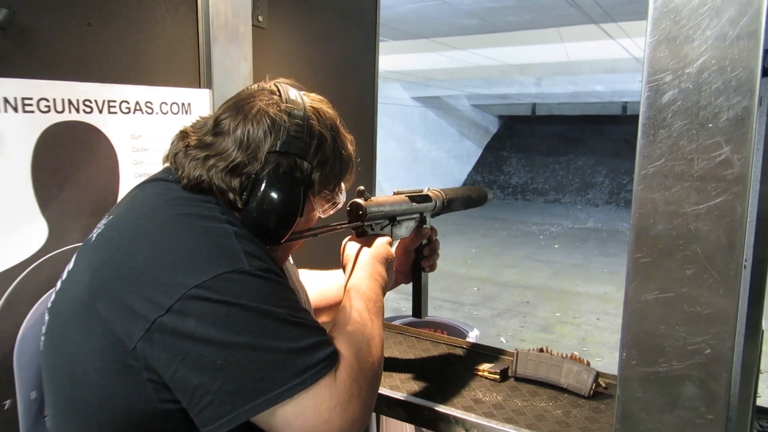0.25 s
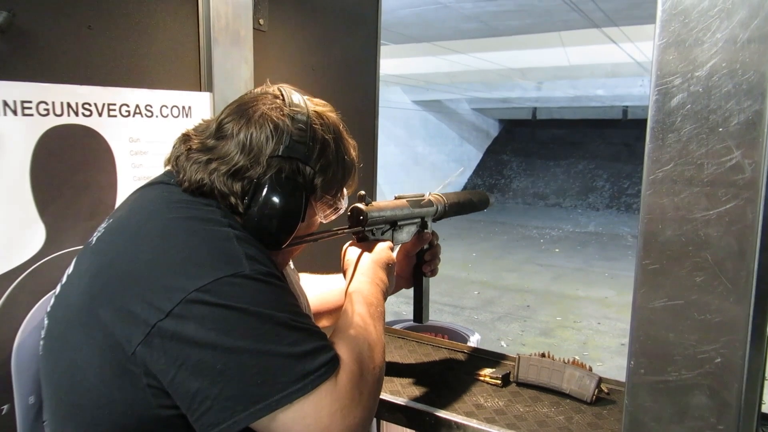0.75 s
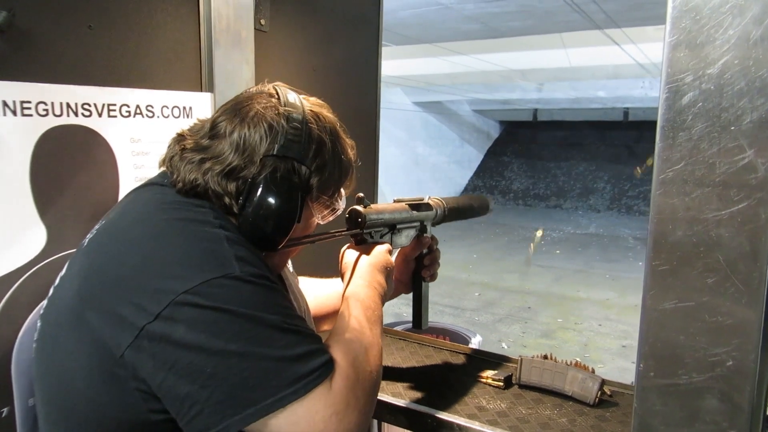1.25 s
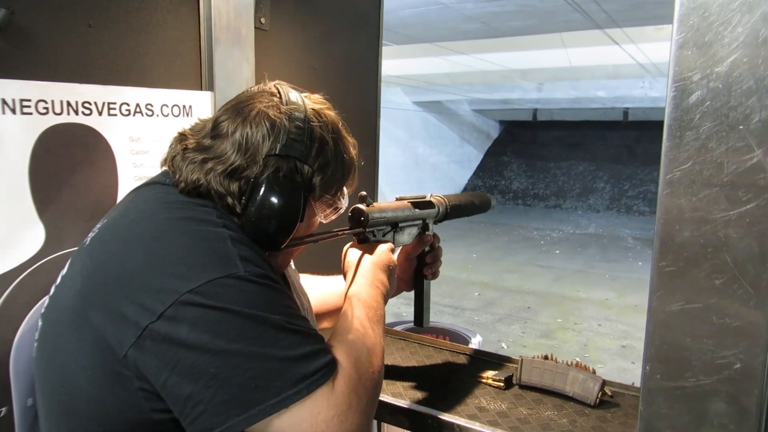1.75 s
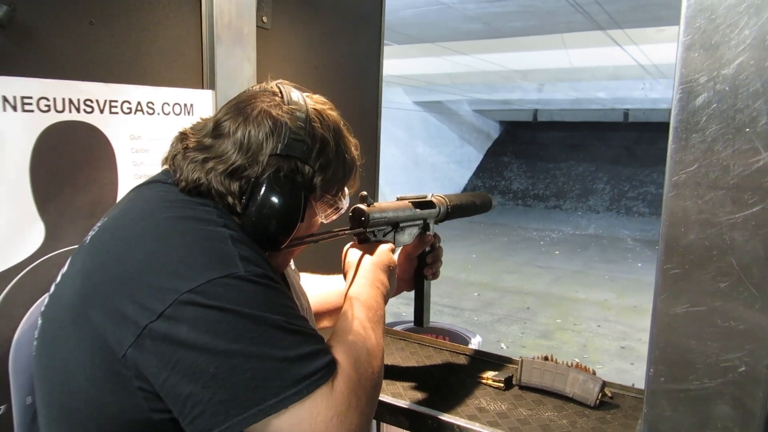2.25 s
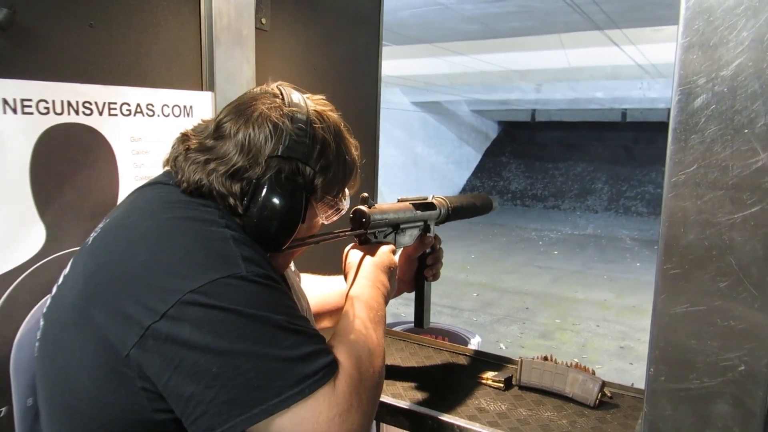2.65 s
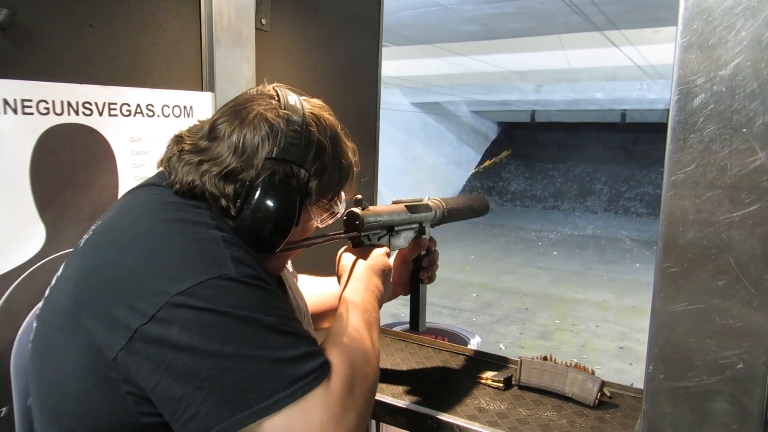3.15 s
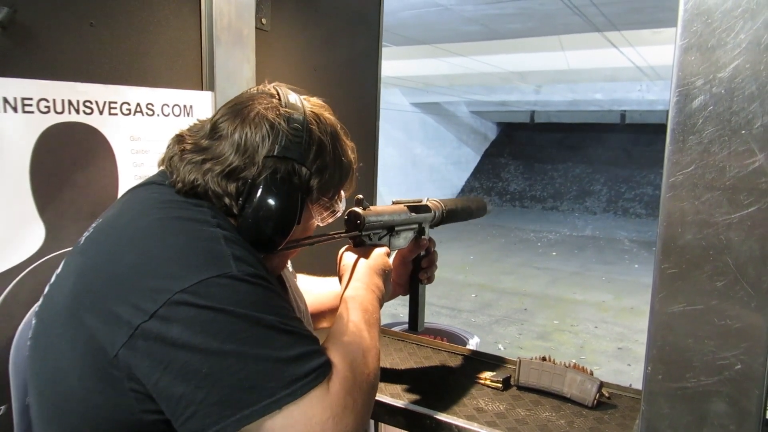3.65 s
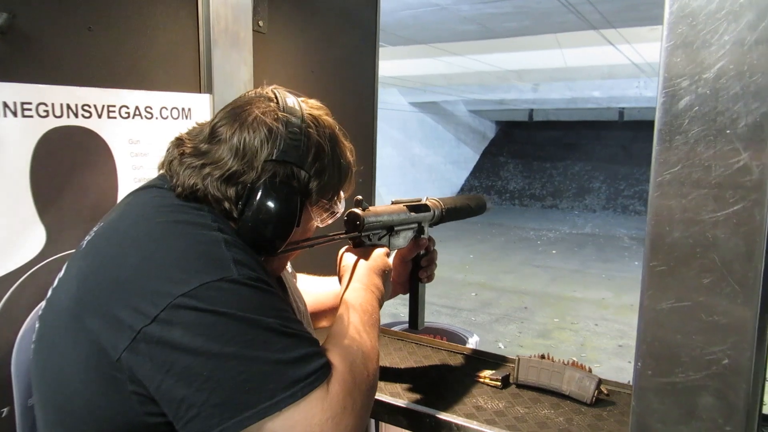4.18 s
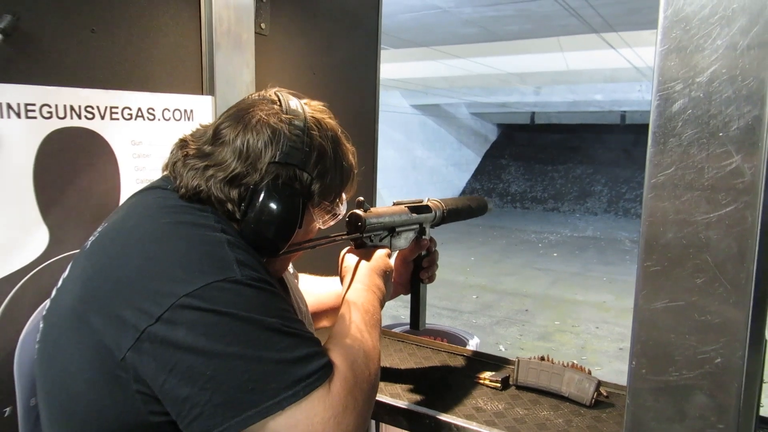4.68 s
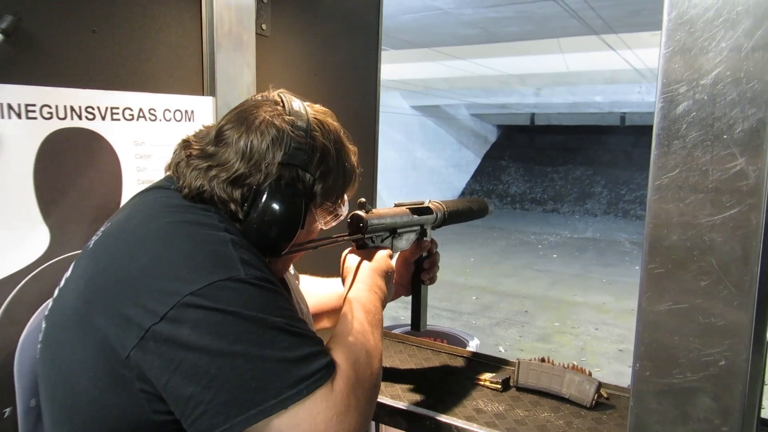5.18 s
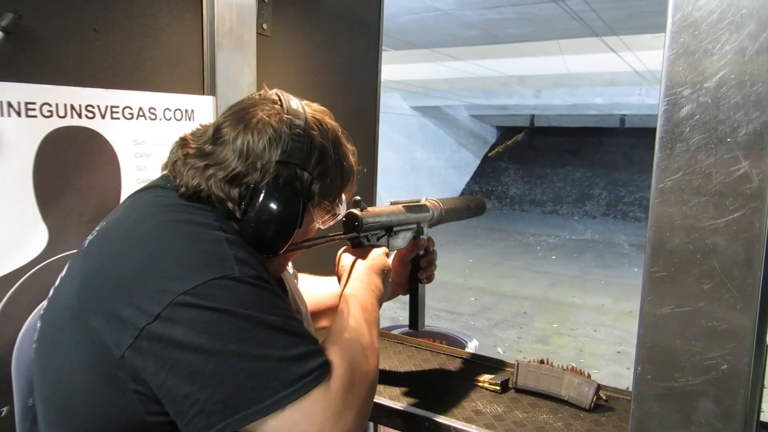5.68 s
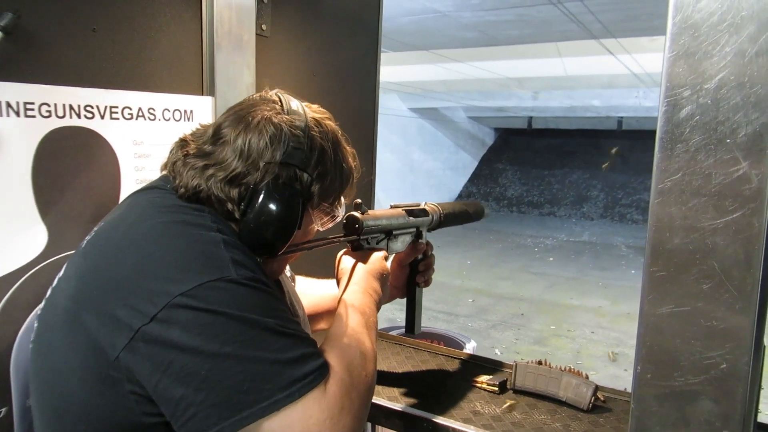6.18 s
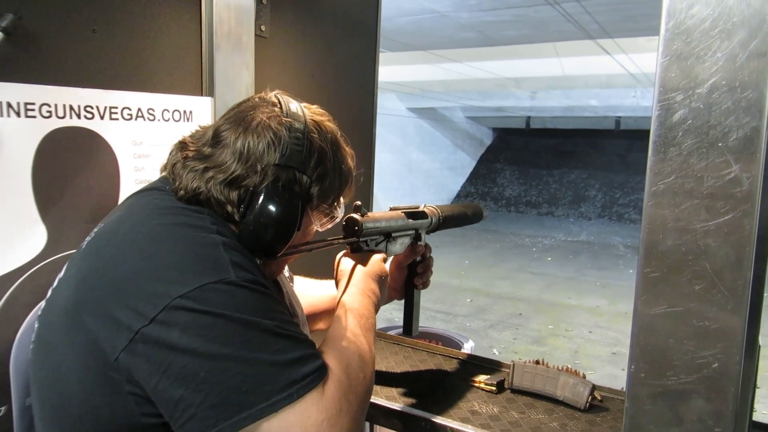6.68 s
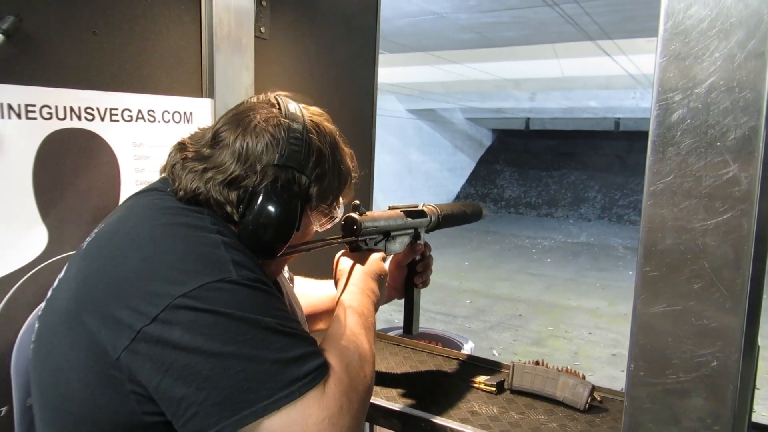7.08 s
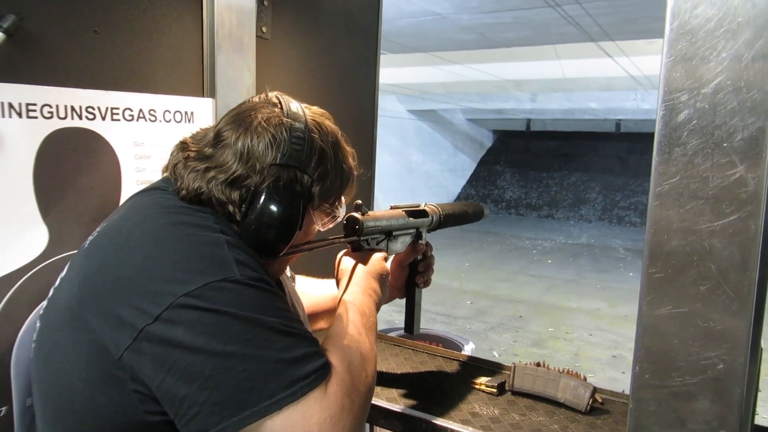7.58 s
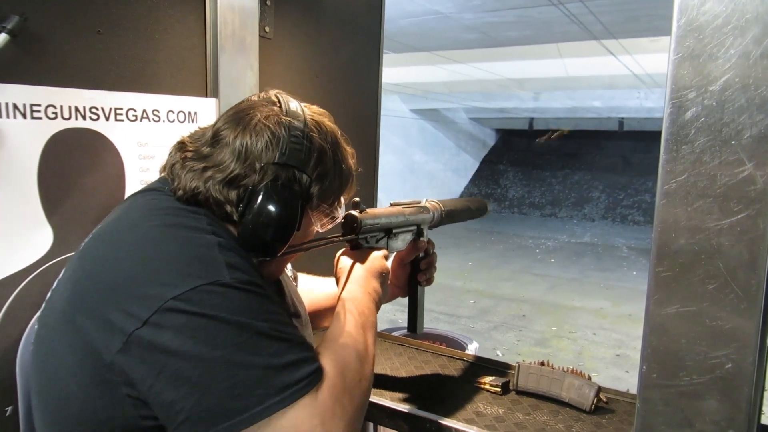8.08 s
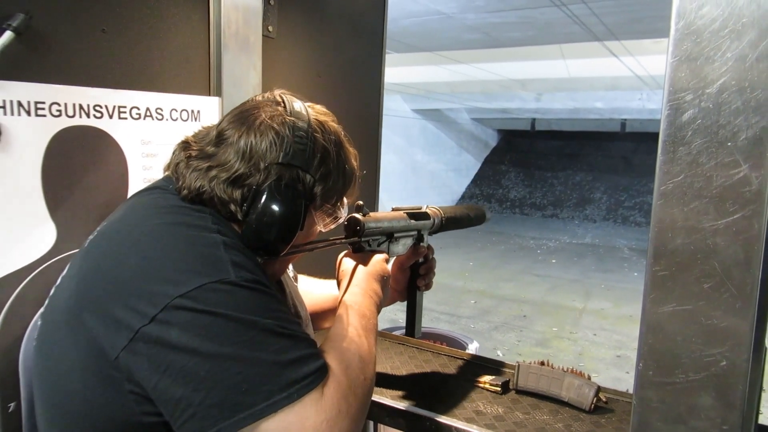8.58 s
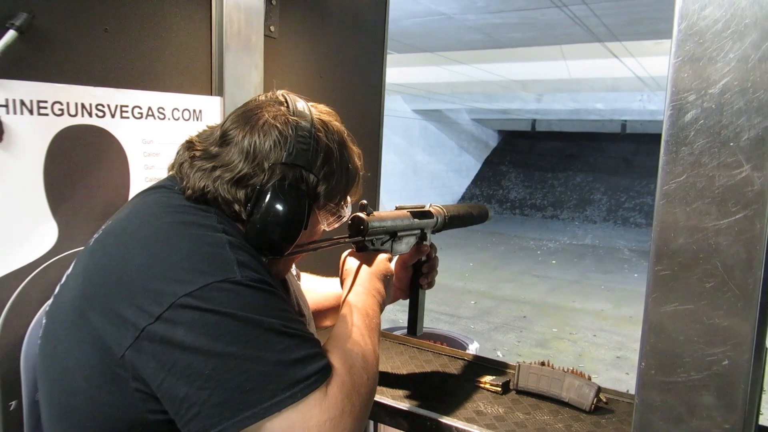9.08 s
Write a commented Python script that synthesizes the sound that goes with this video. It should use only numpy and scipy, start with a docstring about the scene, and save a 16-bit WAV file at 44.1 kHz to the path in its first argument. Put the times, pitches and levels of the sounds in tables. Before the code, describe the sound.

A suppressed submachine gun fires four short bursts in an echoing indoor range, with brass cases tinkling on concrete between them.

```python
"""First comes the rush of ventilation, with a spent case rolling and a clack of steel: an indoor range.
Then a suppressed open-bolt submachine gun fires four short bursts from a booth. Each shot is a pop of
gas and a clatter of the bolt, answered by the bullet's smack on the steel trap down the echoing hall.
Between bursts, steel parts clack and brass cases knock about the booth and tinkle on the concrete.
An automatic gain control turns everything down at each burst, then creeps back up."""
import sys
import numpy as np
from scipy import signal
from scipy.fft import rfft, irfft, next_fast_len
from scipy.io import wavfile

SR = 44100
rng = np.random.default_rng(int(sys.argv[2]) if len(sys.argv) > 2 else 0)


def dump_mix(stems):
    """Bounce the given channels to the path in sys.argv[1] as a 16-bit WAV at rate SR."""
    frames = np.atleast_2d(stems).T  # one column per channel
    limited = np.clip(frames, -1, 1)  # hard clip at full scale
    pcm = np.round(limited * 32767).astype(np.int16)
    wavfile.write(sys.argv[1], SR, pcm)


N = 411894
SPAN = 12288  # samples in one short sound
AGE = np.arange(SPAN) / SR  # seconds since that sound began


def from_db(db):
    """Turn decibels into a number to multiply by."""
    return 10 ** (np.asarray(db) / 20)


def at_hz(points, hz):
    """Read between the rows of a table, giving every octave equal room."""
    known_hz, values = np.transpose(points)
    return np.interp(np.log(np.maximum(hz, 1)), np.log(known_hz), values)


def add(out, s, sound):
    """Mix a sound in, starting at s seconds."""
    start = max(round(s * SR), 0)
    out[:, start:start + sound.shape[-1]] += sound[..., :max(N - start, 0)]


# how much the two microphones differ: (frequency [Hz], difference against shared sound [dB])
STEREO_WIDTH = [(30, -3), (150, -13), (600, -12.5), (2500, -18), (5500, -11.5), (8000, -9), (11000, -4.5),
                (15000, -2)]
# the left microphone is the brighter: (frequency [Hz], left minus right [dB])
STEREO_LEAN = [(2000, 1), (4000, -0.1), (8000, 2.5), (13000, 5)]
def noise(tone, size=SPAN):
    """Stereo noise of a standard strength; tone says how strong each frequency is."""
    hz = np.fft.rfftfreq(size, 1 / SR)
    shared, difference = rfft(rng.standard_normal((2, size)))
    sides = np.array([[1], [-1]])
    mics = shared + sides * difference * from_db(at_hz(STEREO_WIDTH, hz))
    mics *= from_db(sides * at_hz(STEREO_LEAN, hz) / 2)
    x = irfft(mics * tone(hz), size)
    return x / np.sqrt(np.mean(x.mean(0) ** 2))


def shaped(spectrum, peaks=()):
    """A tone that follows a table, with narrow peaks on top."""
    def tone(hz):
        boost_db = sum(db / (1 + (2 * (hz - centre) / width) ** 2) for centre, width, db in peaks)
        return from_db(at_hz(spectrum, hz) + boost_db)
    return tone


def band(low_hz, high_hz, order=4):
    """A tone that falls away outside two frequencies; a higher order falls faster."""
    return lambda hz: ((1 + (low_hz / (hz + 1)) ** (2 * order))
                       * (1 + (hz / high_hz) ** (2 * order))) ** -.5


def resonance(low_hz, high_hz):
    """The tone of an object that answers in one range: the narrower, the more hollow."""
    return lambda hz: (1 + ((hz - low_hz * high_hz / (hz + 1)) / (high_hz - low_hz)) ** 4) ** -.5


def fade(fade_s, age=AGE):
    """Die away by 60 dB in fade_s seconds; every fade time here means this."""
    return np.exp(-np.log(1000) * age / fade_s)


def hit(tone, swell_s, fade_s):
    """Many tiny contacts and close echoes blur into noise that swells and dies."""
    return noise(tone) * (1 - np.exp(-AGE / swell_s)) * fade(fade_s)


def ring(notes, spread_db, detune):
    """A struck object rings at its own notes, their strength and pitch a little different each time."""
    hz, db, fade_s = np.transpose(notes)[:, :, None]
    strength, shift = rng.standard_normal((2, len(notes), 1))
    waves = np.sin(2 * np.pi * hz * (1 + detune * shift) * AGE)
    return np.sum(from_db(db + spread_db * strength) * waves * fade(fade_s), axis=0)


# rushing air: (frequency [Hz], level [dB])
AIR_TONE = [(15, -35), (25, -3), (274, -3), (510, -3.5), (1580, -4.5), (2430, -1.5), (2780, -4.5),
            (5590, -11.5), (6230, -8.5), (15600, -20)]
# whining fans: (frequency [Hz], width [Hz], boost [dB])
FAN_WHINES = [(2440, 48, 2.5), (6270, 38, 12)]
def ventilation(rush_db=-41.0):
    """Air rushes steadily, with a faint whine from the fans."""
    return from_db(rush_db) * noise(shaped(AIR_TONE, FAN_WHINES), size=next_fast_len(N))[:, :N]


# notes of an empty brass case: (pitch [Hz], level [dB], fade time [s])
CASE_NOTES = [(7700, -5, 0.22), (7630, 2.5, 0.15), (7720, -7, 0.22), (9200, -21, .12), (10900, -13, .13),
              (11970, -9, .1), (13550, -23, 0.14), (15150, -24, 0.12)]
def tinkle():
    """A brass case rings like a tiny bell."""
    return ring(CASE_NOTES, spread_db=1.5, detune=.002)


# high notes that a rolling rim brings out: (pitch [Hz], level [dB], fade time [s])
RIM_NOTES = [(11050, -4, 0.086), (13520, -15, .2), (15080, -17, 0.22), (15580, -27, .2)]
# cases rolling on the floor: (start [s], end [s], level [dB])
CASE_ROLLS = [(0.0, .09, -47), (2.384, 2.46, -44), (4.402, 4.87, -45.5), (7.23, 7.85, -43.5)]
def rolling_cases(touches_per_s=120):
    """Many light touches on the floor keep a rolling case ringing."""
    out = np.zeros((2, N))
    age = np.arange(3 * SPAN) / SR
    for start, end, db in CASE_ROLLS:
        touching = (rng.random(len(age)) < touches_per_s / SR) & (age < end - start)
        touches = touching * rng.uniform(-1, 1, len(age))
        ringing = tinkle() + ring(RIM_NOTES, spread_db=1.5, detune=.001)
        add(out, start, from_db(db) * signal.fftconvolve(touches, ringing))
    return out


# steel ringing on after a clack: (pitch [Hz], level [dB], fade time [s])
STEEL_NOTES = [(2342, -25.5, 0.37), (2570, -20.5, 0.5), (3063, -28, 0.53), (3316, -29, .4),
               (3709, -23, .45), (3930, -26, .45), (4662, -23, .5), (5626, -22, .4), (6760, -20, 0.24)]
# gun parts being handled: (time [s], body level [dB], snap level [dB], fade time [s])
STEEL_CLACKS = [(0.097, -43, -23, 0.047), (0.1, -33, -17.5, 0.093), (2.452, -20, -26, 0.079),
                (2.4565, -17, -24, 0.046), (2.4725, -20, -6, 0.023), (2.480, -18, -22, 0.095),
                (7.1583, -20, -21, 0.19)]
def clacks(swell_s=0.00028):
    """Steel meets steel with a hollow body, a bright snap and a faint ring."""
    out = np.zeros((2, N))
    for s, body_db, snap_db, fade_s in STEEL_CLACKS:
        body = hit(resonance(1170, 4130), swell_s, fade_s)
        ringing = ring(STEEL_NOTES, spread_db=6.5, detune=0.00051)
        snap = hit(resonance(3020, 9300), swell_s, fade_s)
        add(out, s, from_db(body_db) * (body + ringing) + from_db(snap_db) * snap)
    return out


def scuffs(per_s=6, level_db=-45, spread_db=3):
    """Faint, bright scuffs come from around the booths at random moments."""
    out = np.zeros((2, N))
    scuff = hit(band(6540, 12900), swell_s=.002, fade_s=0.15)
    times = np.cumsum(rng.exponential(1 / per_s, size=80))
    for s, db in zip(times, rng.normal(level_db, spread_db, size=80)):
        add(out, s, from_db(db) * scuff)
    return out


# the two notes of a case's duller clink: (pitch [Hz], level [dB], fade time [s])
CLINK_NOTES = [(4323, -4.5, 0.16), (4490, -6, 0.14)]
# cases landing on concrete: (time [s], ring level [dB], clink level [dB])
CASE_LANDINGS = [(.463, -24.5, -63), (.5100, -40, -29.5), (1.5000, -41, -50), (2.0857, -35, -27.5),
                 (2.361, -30, -56), (2.4720, -24.5, -50), (3.8970, -33.5, -34), (4.0895, -36.5, -35),
                 (4.4650, -38, -45), (5.0200, -41, -63), (6.669, -37.5, -37), (6.791, -30.5, -53),
                 (6.9300, -35, -55), (8.724, -34.5, -39), (8.8740, -32.5, -29), (9.313, -57, -36.5)]
def landing_cases(bounce_s=0.026, bounce_loss_db=5):
    """A falling case ticks on the floor, rings, clinks and bounces once."""
    out = np.zeros((2, N))
    for s, ring_db, clink_db in CASE_LANDINGS:
        tick_db = max(ring_db - 12, clink_db)
        add(out, s, from_db(tick_db) * hit(band(3500, 9800), swell_s=.0006, fade_s=0.12))
        add(out, s, from_db(ring_db) * tinkle())
        rattle = from_db(-4) * hit(resonance(4060, 4710), swell_s=0.0013, fade_s=0.36)
        clink = rattle + ring(CLINK_NOTES, spread_db=1.5, detune=0.0035)
        add(out, s, from_db(clink_db) * clink)
        add(out, s + bounce_s * rng.uniform(.7, 1.3), from_db(ring_db - bounce_loss_db) * tinkle())
    return out


# the gun's moving steel parts: (frequency [Hz], level [dB])
STEEL_TONE = [(120, -56), (200, -27), (575, -9), (1260, 0), (1910, -4.5), (3070, 0.5), (5410, -3),
              (6490, 1), (7640, -3), (8370, -1.5), (15600, -23)]
def steel_click(swell_s, fade_s):
    """Parts inside the gun strike or slide against each other."""
    return hit(shaped(STEEL_TONE), swell_s, fade_s)


# the clattering bolt: (frequency [Hz], level [dB])
BOLT_TONE = [(100, -22.5), (250, -13), (500, -17.5), (700, -8.5), (1100, -10), (1700, -7.5), (2800, -5),
             (3700, -1), (4500, -0.5), (5500, -5), (7000, -3.5), (9000, -4), (10500, -10), (13400, -13.5),
             (15600, -20)]
# narrow ranges that the booth makes louder: (frequency [Hz], width [Hz], boost [dB])
BOOTH_PEAKS = [(830, 38, 17), (1433, 38, 4), (1650, 94, 9), (3570, 290, 5), (3950, 300, 3), (6800, 240, 7)]
def bolt_clatter():
    """The bolt, the sliding block that loads and fires, clatters with each shot."""
    return hit(shaped(BOLT_TONE, BOOTH_PEAKS), swell_s=.0006, fade_s=0.14)


def pressure_wave(delay_s, pitch_hz=950):
    """The air gives one push, then sucks back."""
    phase = 2 * np.pi * pitch_hz * (delay_s - AGE)
    return phase * np.exp((1 - phase ** 2) / 2)


# notes of the suppressor and booth, rung by the pop: (pitch [Hz], level [dB], fade time [s])
POP_NOTES = [(224, -29, 0.19), (553, -13, 0.028), (651, -8, 0.032), (827, -27.5, 0.15),
             (1129, -15.5, 0.065), (1365, -24.5, 0.14), (1724, -25, 0.041), (3270, -48, 0.021),
             (4140, -11, 0.0058)]
def muzzle_pop(arrival_s=.0011, wall_delay_s=0.001668, lowest_hz=520, left_lag_s=.00013):
    """A pulse of gas leaves the gun, bounces off the booth wall and leaves a short ring."""
    pulse = pressure_wave(arrival_s) + from_db(-3) * pressure_wave(arrival_s + wall_delay_s)
    ringing = np.interp(AGE - arrival_s, AGE, ring(POP_NOTES, spread_db=2, detune=.004), left=0)
    # the suppressor's small mouth gives out little bass
    bass_cut = signal.butter(2, lowest_hz, "high", fs=SR, output="sos")
    pop = signal.sosfilt(bass_cut, pulse + from_db(-1) * ringing)
    # the muzzle is off to the right, so the left microphone hears it later
    return np.array([np.interp(AGE - left_lag_s, AGE, pop, left=0), pop])


def gas_puff(length_s, arrival_s=.0008, left_share=-1.22):
    """Escaping gas shoves the two microphones opposite ways, then sucks them back."""
    progress = np.maximum(AGE - arrival_s, 0) / length_s
    return np.array([[left_share], [1]]) * progress * (1 - progress) * np.exp(1 - progress)


def gas_thump(length_s=0.001, left_share=0.16):
    """The cloud of gas behind the puff leans on the microphones more slowly."""
    progress = AGE / length_s
    return np.array([[left_share], [1]]) * progress * np.exp(1 - progress)


# the steel trap that stops the bullets: (frequency [Hz], level [dB])
TRAP_TONE = [(71, -59), (120, -58), (509, -16), (1200, -6.5), (1660, -6.5), (1830, 0), (2810, -6),
             (3520, 0.5), (4060, 1), (5400, -3), (6750, -3.5), (7630, -10), (8790, -6), (12900, -17),
             (15600, -27)]
def trap_smack(hold_s=0.03, echo_fade_s=0.21, smack_fade_s=0.083):
    """The bullet hits steel far away; uneven echoes follow from the floor and hanging panels."""
    lump_times = AGE[::128]
    lumps = from_db(np.interp(AGE, lump_times, rng.uniform(-2.5, 2.5, len(lump_times))))
    swell = 1 - np.exp(-AGE / 0.0025)
    echoes = lumps * swell * fade(echo_fade_s, np.maximum(AGE - hold_s, 0))
    smack = from_db(1) * fade(smack_fade_s)
    return noise(shaped(TRAP_TONE)) * np.hypot(smack, echoes)


def bolt_catch():
    """A latch stops the bolt with a click that also thuds through the gun's frame."""
    click = steel_click(swell_s=0.0024, fade_s=0.044)
    thud = hit(resonance(490, 1120), swell_s=.0005, fade_s=0.038)
    return click + from_db(-15.5) * thud


# the lead-in to a burst, as the trigger moves, the latch lets go and the bolt slides forward:
# (time before the first shot [s], level [dB], swell time [s], fade time [s])
LEAD_IN_CLICKS = [(.053, -22, 0.0033, 0.062), (.0244, -18.5, .0003, 0.054), (0.013, -11, 0.0041, 0.25)]
# every shot: (time [s], clatter level [dB], pop level [dB])
GUNSHOTS = [(0.7945, 9.5, 15), (0.9328, 4, 12), (2.8789, 7.5, 11.5), (3.0278, 10.5, 12.5),
            (3.1690, 6.5, 14.5), (3.3152, 4.5, 5.5), (5.5069, 11.5, 20.5), (5.649, 7, 11.5),
            (5.7885, 4.5, 8.5), (7.9026, 9.5, 16.5), (8.0296, 6.5, 12.5), (8.169, 4, 10.5)]
# every burst: (catch time [s], catch level [dB], lead-in level [dB],
# first puff level [dB], first puff length [s], first thump level [dB])
GUN_BURSTS = [(1.0358, 3.5, -1.5, 6, .00045, -15), (3.4250, 1, -3.5, 7, .0004, -32),
              (5.9025, 6, -1, 7, 0.0006, 4.5), (8.2842, 6, 0.5, -24, .0005, -32)]
def gun(pause_s=.5, trap_delay_s=.0528):
    """Each burst clicks into motion, fires shots that the trap answers, and ends with the bolt caught."""
    out = np.zeros((2, N))
    shots = np.array(GUNSHOTS)
    burst_starts = np.flatnonzero(np.diff(shots[:, 0]) > pause_s) + 1
    later_gas = (-20, 0.001, -33)  # later shots find the suppressor already full of gas
    for burst, settings in zip(np.split(shots, burst_starts), GUN_BURSTS):
        catch_s, catch_db, lead_db, *first_gas = settings
        for before_s, db, swell_s, fade_s in LEAD_IN_CLICKS:
            add(out, burst[0, 0] - before_s, from_db(lead_db + db) * steel_click(swell_s, fade_s))
        for k, (s, clatter_db, pop_db) in enumerate(burst):
            puff_db, puff_s, thump_db = later_gas if k else first_gas
            add(out, s, from_db(clatter_db) * bolt_clatter())
            add(out, s, from_db(pop_db) * muzzle_pop())
            add(out, s, from_db(puff_db) * gas_puff(puff_s) + from_db(thump_db) * gas_thump())
            add(out, s + trap_delay_s, from_db(clatter_db - 10.5) * trap_smack())
        add(out, catch_s, from_db(catch_db) * bolt_catch())
    return out


# knocks on the booth wall and bench: (time [s], level [dB], panel pitch [Hz], tick level [dB])
PANEL_KNOCKS = [(1.4225, -23.5, 615, -50), (1.429, -24, 1370, -50), (1.495, -19, 1460, -20),
                (2.1051, -30, 4250, -21), (2.658, -30, 3950, -48), (6.039, -26, 4000, -12),
                (6.2116, -14, 1300, -28.5), (6.432, -25.5, 1810, -28.5), (6.9235, -28.5, 3300, -43),
                (8.9612, -26.5, 3500, -33), (9.2525, -28.5, 1010, -41)]
def knocks(swell_s=0.00018, pitch_spread=1.28):
    """A struck panel gives a short, dead knock around its own pitch, plus the tick of the contact."""
    out = np.zeros((2, N))
    for s, db, hz, tick_db in PANEL_KNOCKS:
        knock = hit(resonance(hz / pitch_spread, hz * pitch_spread), swell_s, fade_s=0.069)
        tick = hit(resonance(2780, 8900), swell_s, fade_s=0.092)
        add(out, s, from_db(db) * knock + from_db(tick_db) * tick)
    return out


# how long the hall echoes: (frequency [Hz], fade time [s])
ECHO_FADES = [(100, 0.44), (500, 0.77), (1500, 1), (3500, 1), (5000, 0.9), (8000, 0.6), (14000, 0.42)]
# how strongly it echoes: (frequency [Hz], level [dB])
ECHO_TONE = [(100, -9), (220, -1.5), (400, -7), (2000, -6.5), (4300, -3), (8000, -4.5), (14000, -9.5)]
def hall(x, swell_s=0.0081):
    """The long concrete hall echoes; each half octave dies away at its own pace."""
    age = np.arange(4 * SPAN) / SR
    edges_hz = 62.5 * 2 ** np.arange(0, 8.1, .5)
    echo = 0
    for low, high in zip(edges_hz, edges_hz[1:]):
        hz = np.sqrt(low * high)
        outline = fade(at_hz(ECHO_FADES, hz), age) * (1 - np.exp(-age / swell_s))
        gain = from_db(at_hz(ECHO_TONE, hz)) * np.sqrt(2 * (high - low) / SR / np.sum(outline ** 2))
        echo = echo + gain * outline * noise(band(low, high, order=8), size=len(age))
    return signal.fftconvolve(x.mean(0)[None], echo, axes=1)[:, :N]


def scene(booth_leak_db=-3):
    """All the sounds play over the ventilation; the booth partly shields its own from the hall."""
    in_hall = gun() + landing_cases() + rolling_cases()
    in_booth = knocks() + clacks() + scuffs()
    echoes = hall(in_hall + from_db(booth_leak_db) * in_booth)
    return in_hall + in_booth + echoes + ventilation()


def smooth(x, time_s):
    """Even out changes that are quicker than time_s."""
    keep = np.exp(-1 / (time_s * SR))
    return signal.lfilter([1 - keep], [1, -keep], x)


def gain_control(x, ceiling_db=-11.5, sense_s=0.0024, drop_s=0.0016, recover_s=1.57, ahead_s=0.0013):
    """The volume drops quickly when the sound passes the ceiling, then creeps back up."""
    t = np.arange(N) / SR
    level = np.sqrt(smooth(np.mean(x ** 2, axis=0), sense_s))
    cut = 1 - 1 / np.maximum(level / from_db(ceiling_db), 1)
    recovery = np.exp(-t / recover_s)
    held_cut = np.maximum.accumulate(cut / recovery) * recovery
    gain = np.exp(smooth(np.log(1 - held_cut), drop_s))
    return x * np.interp(t + ahead_s, t, gain)  # it reacts slightly ahead of the sound


def record(dry, hiss_db=-57, highest_hz=15750):
    """The electronics ride the volume, add faint hiss, flatten the loudest peaks and cut the very top."""
    hiss = noise(band(1900, 4500, order=2), size=next_fast_len(N))[:, :N]
    overloaded = np.clip(gain_control(dry) + from_db(hiss_db) * hiss, -1, 1)
    top_cut = signal.ellip(10, .2, 70, highest_hz, fs=SR, output="sos")
    return signal.sosfilt(top_cut, overloaded)


dry = scene()
out = record(dry)
dump_mix(out)
```